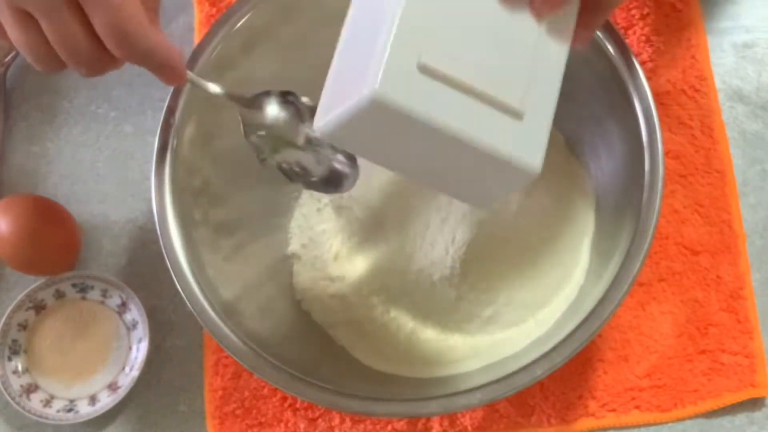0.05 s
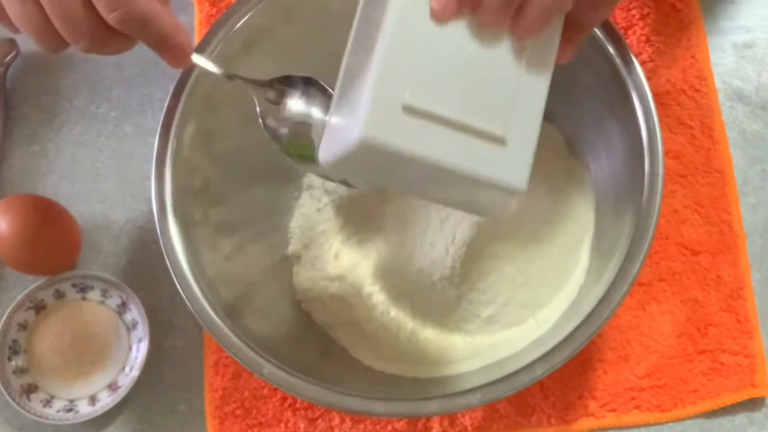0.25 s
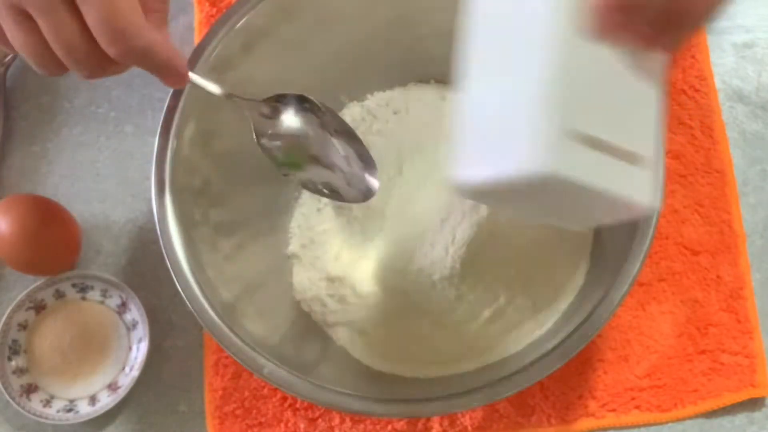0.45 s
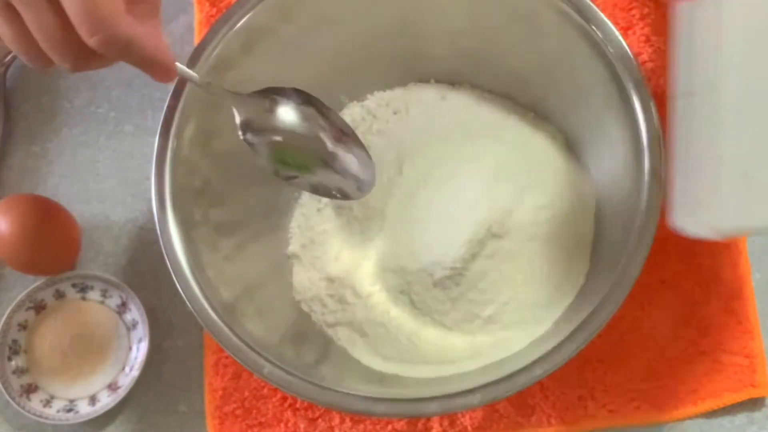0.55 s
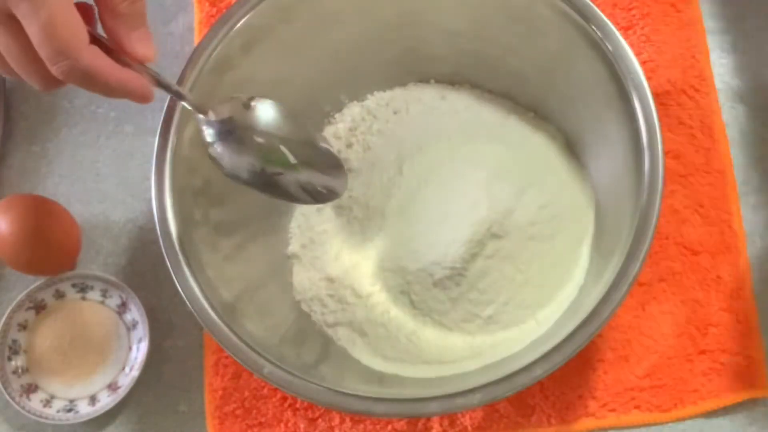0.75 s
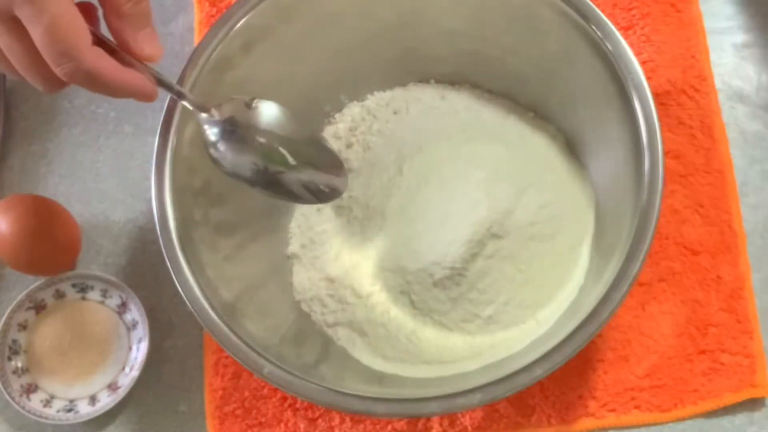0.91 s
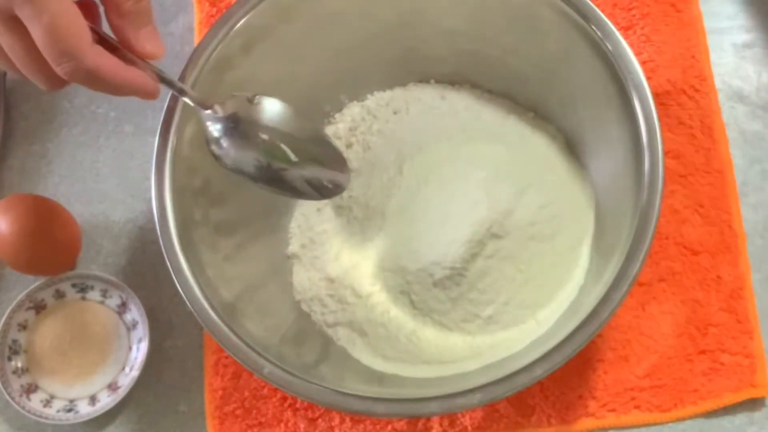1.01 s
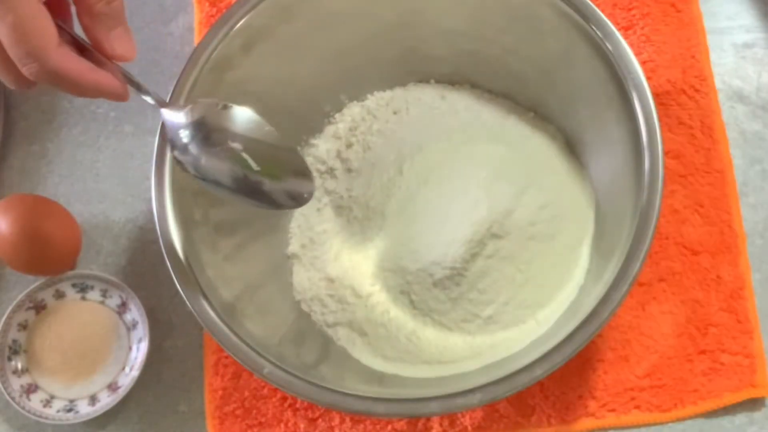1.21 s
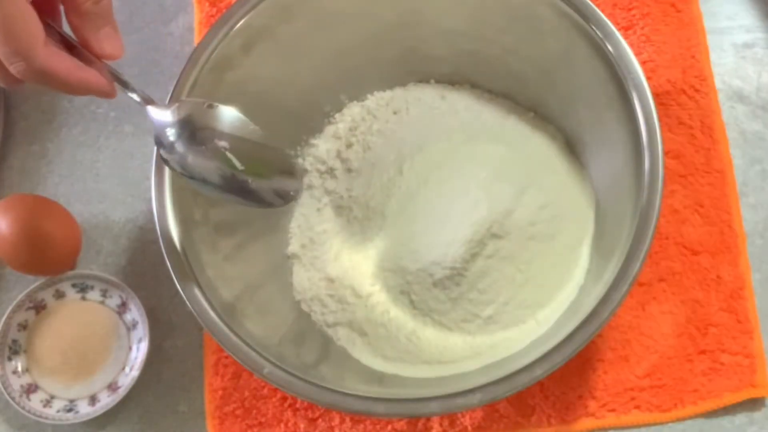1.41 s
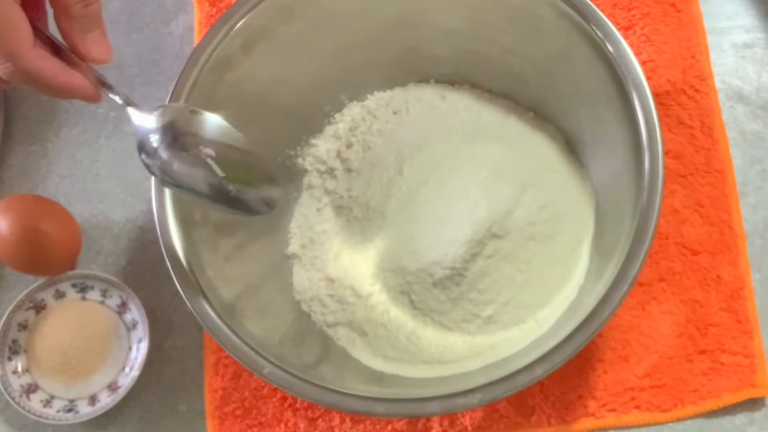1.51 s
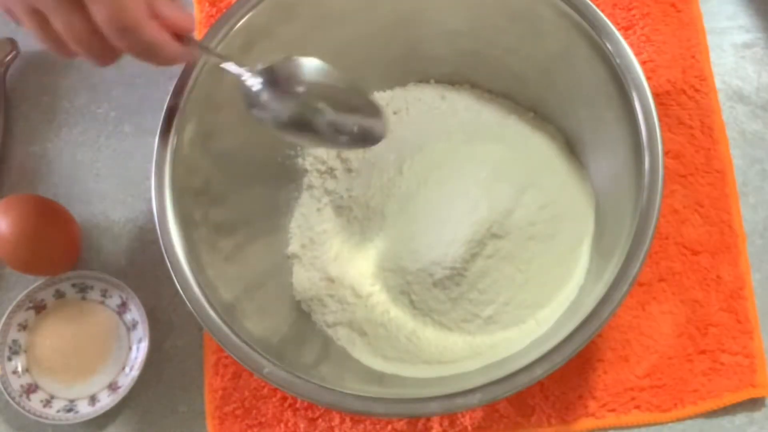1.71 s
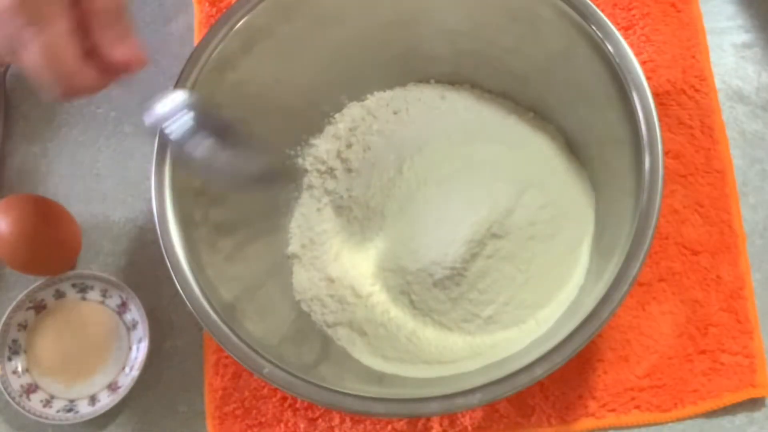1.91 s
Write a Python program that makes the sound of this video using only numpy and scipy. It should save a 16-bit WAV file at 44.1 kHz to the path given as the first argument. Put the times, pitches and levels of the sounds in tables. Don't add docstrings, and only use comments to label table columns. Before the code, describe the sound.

Sharp spoon clack on hollow plastic with faint steel ring, then light taps and a soft counter thud

```python
import sys
import numpy as np
from scipy import signal
from scipy.fft import rfft, irfft
from scipy.io import wavfile
from scipy.ndimage import uniform_filter1d

SR = 44100
rng = np.random.default_rng(int(sys.argv[2]) if len(sys.argv) > 2 else 0)


def rack_gain(trim_db):
    fader = np.asarray(trim_db, float)
    return 10 ** (fader / 20)


def wav_out(sig):
    wavfile.write(sys.argv[1], SR, np.round(np.clip(np.atleast_2d(sig).T, -1, 1) * 32767).astype(np.int16))


N = 85995

# start in seconds, force in dB, contact time in ms, bright tick in dB.
SPOON_RAP = [
    (.2020, -30.5, .3, -46),
    (.2052, -12.5, 0.27, -15),
    (.2080, -26, 0.14, -18),
    (.2115, -20.5, 0.25, -19.5),
    (.2150, -31.5, 0.2, -24),
]
EDGE_TAP = [
    (1.3950, -37, 0.041, -42),
    (1.3980, -24, 0.29, -50.5),
    (1.4050, -37, 2.5, -52.5),
    (1.4180, -30, 1, -55),
]
CORNER_TAP = [
    (1.5145, -24.5, 0.34, -39),
    (1.5165, -30, 0.44, -49),
    (1.5270, -35, 0.45, -39),
]
SET_DOWN = [
    (1.6365, -32, 0.096, -58.5),
    (1.6410, -61, 0.23, -47.5),
    (1.6480, -34.5, 0.032, -56),
    (1.6510, -21.5, 0.42, -29),
    (1.6570, -28, 1.5, -35.5),
    (1.6700, -26, 0.33, -46.5),
    (1.6890, -37, 2.5, -42),
    (1.7080, -38.5, 0.16, -67),
    (1.7240, -32, 1.2, -66),
]
ROCK = [
    (1.048, -46, 0.8, -76),
    (1.065, -41.5, 2.9, -80.5),
    (1.779, -47.5, 0.34, -85),
    (1.7972, -35.5, 0.42, -61),
    (1.805, -37, 1.7, -68),
]

# level in dB, t60 in seconds; pitches in Hz in the list below it.
TUB_MODES = [(-3, .045), (3, .04), (6, .05), (-7, .045), (5, .045), (-4, .045), (-3, .04), (-5, .06),
             (0, .04), (-3, .045), (-9, .035), (1, .05), (-16, .03), (-10.5, .04)]
TUB_HZ = [937, 293, 474, 848, 1178, 1403, 1695, 1855, 2128, 2223, 2541, 2728, 3215, 5865]
BOWL_MODES = [(-23, .36), (-27, .4), (-29, .22), (-21, .25), (-24, .42), (-15, .42), (-23, .25), (-23, .3),
              (-26, .25)]
BOWL_HZ = [490, 458, 663, 1112, 1140, 1171, 1216, 1270, 2433]
EDGE_MODES = [(-8, .11), (-5, .08), (-10, .035), (-15, .07), (-12, .04), (1, .025), (-14, .09), (-7, .04)]
EDGE_HZ = [233, 307, 850, 980, 1133, 1835, 2460, 3311]
CORNER_MODES = [(-7, .05), (-4, .025), (-2, .025), (-21, .18), (-12, .03), (-20, .12), (2, .025),
                (-17, .17), (-5, .03)]
CORNER_HZ = [318, 870, 1000, 960, 1500, 1728, 2169, 2480, 3418]
COUNTER_MODES = [(-3, .1), (-6, .12), (-2, .11), (-1, .1), (-6, .09), (-9, .08), (-7, .06), (-14, .04),
                 (-12, .035), (-11, .035), (-3, .04), (-3, .031), (-12, .05), (-16, .03)]
COUNTER_HZ = [95, 138, 209, 286, 328, 370, 492, 670, 800, 985, 1100, 1873, 2439, 3510]

# frequency in Hz, level in dB.
SPOON_TICK = [(300, -30), (1100, -18), (2500, -7), (4500, 9), (8000, -8), (11000, -10.5), (13500, -36),
              (15500, -20)]
COUNTER_TICK = [(150, -18), (500, -20), (1100, -13), (2500, -7), (4500, 5.5), (8000, -24), (12500, -30),
                (14700, -26)]
# start in seconds, level in dB, t60 in seconds.
THUMPS = [
    (1.058, -56, .08),
    (1.4, -50, .12),
    (1.654, -39, .36),
    (1.799, -47, .14),
]
# frequency in Hz, level in dB.
BOOM = [(60, -12), (110, -4), (200, -1), (330, -1), (600, -14), (1100, -16), (2500, -24), (6000, -60)]
# centre in seconds, half length in seconds, level in dB.
RUSTLES = [
    (1.06, 0.014, -84.5),
    (1.2, 0.14, -76.5),
    (1.578, 0.12, -63),
    (1.856, 0.058, -64),
]

# frequency in Hz, level in dB per Hz.
AIR = [(25, -27), (65, 4.5), (250, -0.5), (400, -9), (900, -13), (2400, -29), (4400, -37), (11000, -49),
       (14000, -69.5)]
# frequency in Hz, width in Hz, level in dB.
HUM = [(160, 25, -67), (291, 44, -61.5), (642, 20, -74.5), (2100, 300, -92)]
# frequency in Hz, t60 in seconds.
KITCHEN_T60 = [(150, 0.75), (500, 0.33), (1500, 0.59), (4000, 0.31), (9000, 0.27), (15000, 0.05)]
# frequency in Hz, level in dB.
TAIL_COLOUR = [(150, -15), (350, -9.5), (700, -8.5), (1200, -4.5), (2000, -2), (3300, 4.5), (8000, 0),
               (15000, -0.5)]

# frequency in Hz, common share from 0 to 1.
ALIKE = [(60, .98), (300, .93), (500, .4), (2500, .45), (3700, 1), (16000, 1)]
# frequency in Hz, left minus right in dB.
LEAN = [(60, -1), (300, -4.4), (550, -3), (850, -.3), (1300, -1.8), (2400, -.8), (3600, 0)]
# frequency in Hz, lag in radians.
TWIST = [(100, -.15), (300, -.65), (550, -.9), (850, .6), (1200, 1.25), (2200, .2)]
TREBLE_TWIST = [(4000, .15), (5100, -.3), (6500, 0), (8500, .3)]


def evened(x):
    return x / np.sqrt(np.mean(x ** 2) + 1e-20)


def read(points, hz):
    f, value = np.transpose(points)
    return np.interp(np.log(hz + 1), np.log(f + 1), value)


def coloured(x, points):
    n = x.shape[-1]
    return irfft(rfft(x) * rack_gain(read(points, np.fft.rfftfreq(n, 1 / SR))), n)


def room_air():
    air_db, patch_db = -57, 1.6
    frames, hz = N // 256 + 5, np.fft.rfftfreq(1024, 1 / SR)
    a, b, c, d, patches = rng.standard_normal((frames, 513, 5)).T
    patches = uniform_filter1d(patches, size=8, axis=0)
    patches = evened(uniform_filter1d(patches, size=14, axis=1))
    z = np.array([a + 1j * b, c + 1j * d])
    z = z * rack_gain(read(AIR, hz)[:, None] + patch_db * patches)
    noise = signal.istft(z, nperseg=1024, noverlap=768)[1][:, :N]
    return rack_gain(air_db) * evened(noise)


def fridge_hum():
    hz, out = np.fft.rfftfreq(N, 1 / SR), np.zeros((2, N))
    for f, width, db in HUM:
        narrow = 1 / (1 + (2 * (hz - f) / width) ** 2)
        out += rack_gain(db) * evened(irfft(rfft(rng.standard_normal((2, N))) * narrow, N))
    return out


def kitchen(x):
    tail_db, early_db = -11.5, -17
    taps = np.zeros((2, SR // 2))
    at = np.arange(200, SR // 2 - 20, 20) + rng.integers(0, 20, (2, (SR // 2 - 201) // 20))
    np.put_along_axis(taps, at, rng.choice([-1., 1.], at.shape), 1)
    hz, t, z = signal.stft(taps, SR, nperseg=256)
    decay_db = read(TAIL_COLOUR, hz)[:, None] - 60 * t / read(KITCHEN_T60, hz)[:, None]
    tail = signal.istft(z * rack_gain(decay_db), SR, nperseg=256)[1]
    tail *= rack_gain(tail_db) / np.linalg.norm(tail[0])
    early = rng.integers(15, 500, (2, 6))
    bounces = rack_gain(early_db - early / 150.0) * rng.choice([-1., 1.], early.shape)
    np.put_along_axis(tail, early, bounces, 1)
    return signal.fftconvolve(x[None], tail, axes=1)[:, :N]


def stirred(x):
    flutter = 1.3
    stir = uniform_filter1d(rng.standard_normal(N), size=90)
    stir = evened(uniform_filter1d(stir, size=90))
    return x * evened(1 + flutter * stir)


def cloth_rustle():
    t = np.arange(N) / SR
    swell = sum(rack_gain(db) * np.exp(-((t - s) / half) ** 2) for s, half, db in RUSTLES)
    grains = rng.standard_normal(N) * rack_gain(3.8 * rng.exponential(1, N))
    cloth = [(200, 6.5), (1500, 9.5), (5000, -6), (9000, -19.5), (14000, -35)]  # (Hz, dB)
    return swell * evened(coloured(grains, cloth))


def counter_boom():
    rise_s = 0.0028
    t, swell = np.arange(N) / SR, np.zeros(N)
    for s, db, t60 in THUMPS:
        since = np.maximum(t - s, 0)
        swell += rack_gain(db - 60 * since / t60) * (1 - np.exp(-since / rise_s))
    return swell * evened(coloured(rng.standard_normal(N + N % 2), BOOM))[:N]


def knock(contacts, mode_hz, modes, tick, tick_t60):
    wobble = .012
    rise_cycles, rise_floor_hz = 3.3, 200
    snap_db, snap_t60 = 0, 0.003
    t, out = np.arange(SR // 3) / SR, np.zeros(N + SR)
    short = t[:4096]
    db, t60 = np.transpose(modes)[:, :, None]
    fade = rack_gain(-60 * short / tick_t60) + rack_gain(snap_db - 60 * short / snap_t60)
    for k, (s, force_db, ms, tick_db) in enumerate(contacts):
        shift = wobble * min(k, 1) * rng.standard_normal(len(modes))
        hz = (mode_hz * (1 + shift))[:, None]
        swell = 1 - np.exp(-t * (hz + rise_floor_hz) / rise_cycles)
        ring = (rack_gain(db - 60 * t / t60) * swell * np.sin(2 * np.pi * hz * t)).sum(0)
        push = np.sin(np.pi * np.clip(t[:256] * 1000 / ms, 0, 1)) ** 2 + 1e-9
        at = round(s * SR)
        out[at:at + len(t)] += rack_gain(force_db) * signal.fftconvolve(ring, push / push.sum())[:len(t)]
        hiss = evened(coloured(rng.standard_normal(4096), tick))
        out[at:at + 4096] += rack_gain(tick_db) * fade * hiss
    return out[:N]


def tub_on_counter():
    edge = knock(EDGE_TAP, EDGE_HZ, EDGE_MODES, COUNTER_TICK, 0.099)
    corner = knock(CORNER_TAP, CORNER_HZ, CORNER_MODES, COUNTER_TICK, 0.026)
    landing = knock(SET_DOWN + ROCK, COUNTER_HZ, COUNTER_MODES, COUNTER_TICK, 0.082)
    return edge + corner + landing


def spoon_on_tub():
    return knock(SPOON_RAP, TUB_HZ + BOWL_HZ, TUB_MODES + BOWL_MODES, SPOON_TICK, 0.028)


def scene():
    near = spoon_on_tub() + tub_on_counter() + counter_boom() + cloth_rustle()
    low_cut = signal.butter(3, 80, "high", fs=SR, output="sos")
    near = signal.sosfilt(low_cut, near)
    return near + kitchen(stirred(near)) + room_air() + fridge_hum()


def smear(x):
    haze_db, haze_s, haze_hz = -19, .0045, 7800
    t = np.arange(1024) / SR
    low_pass = signal.butter(6, haze_hz, fs=SR, output="sos")
    haze = signal.sosfilt(low_pass, rng.standard_normal(1024)) * np.exp(-t / haze_s)
    haze = haze[None, ::-1] / np.linalg.norm(haze)
    return x + rack_gain(haze_db) * signal.fftconvolve(x, haze, axes=1)[:, 1023:]


def ports(x):
    left_lag, top_hz, top_order = 5, 15600, 50
    hz = np.fft.rfftfreq(N, 1 / SR)
    left, right = rfft(x) / (1 + (hz / top_hz) ** top_order)
    same = read(ALIKE, hz)
    left = (same * right + (1 - same) * left) / np.sqrt(same ** 2 + (1 - same) ** 2)
    left *= rack_gain(read(LEAN, hz)) * np.exp(-1j * read(TWIST + TREBLE_TWIST, hz))
    left *= np.exp(-2j * np.pi * hz * left_lag / SR)
    return irfft(np.array([left, right]), N)


def gain_control(x):
    duck_from_db, duck_share, recover_db_per_s = -29.5, 0.086, 40.5
    power = abs(uniform_filter1d((x ** 2).mean(0), size=400))
    fall = np.arange(N) * recover_db_per_s / SR
    held_db = np.maximum.accumulate(10 * np.log10(power + 1e-12) + fall) - fall
    over_db = np.maximum(held_db - duck_from_db, 0)
    return x / rack_gain(duck_share * uniform_filter1d(over_db, size=200))


def roll_off(x):
    return signal.sosfilt(signal.butter(12, 16660, fs=SR, output="sos"), x)


def record(dry):
    mix = gain_control(ports(smear(dry)))
    return roll_off(mix)


dry = scene()
out = record(dry)
wav_out(out)
```